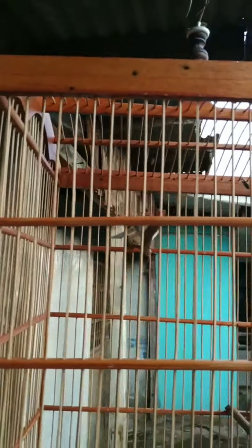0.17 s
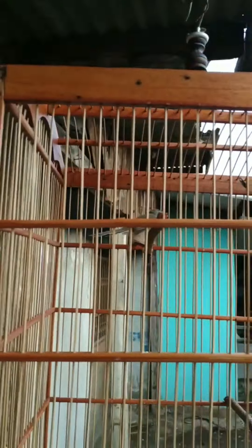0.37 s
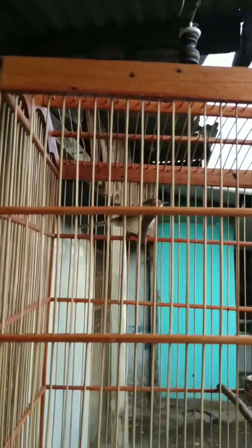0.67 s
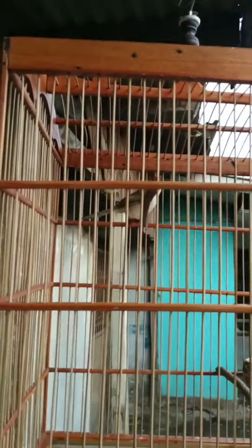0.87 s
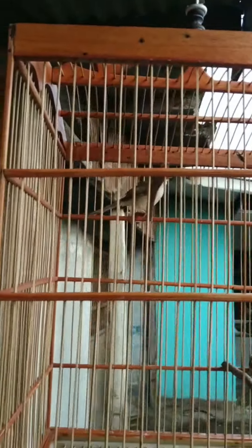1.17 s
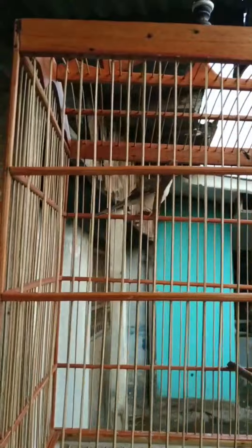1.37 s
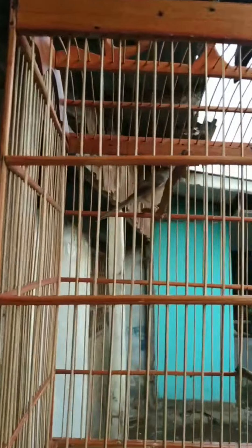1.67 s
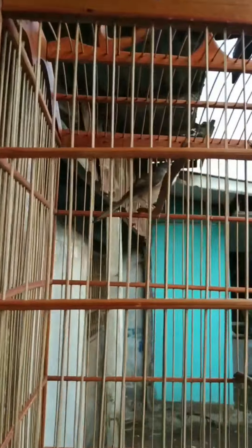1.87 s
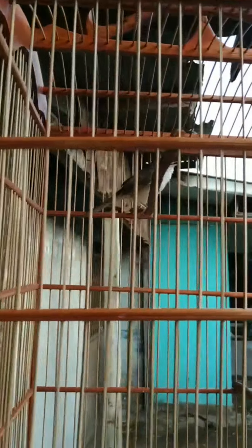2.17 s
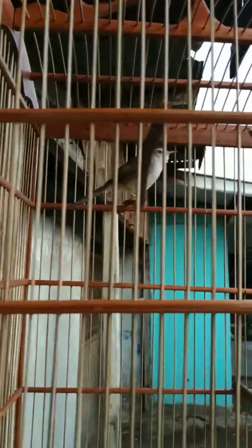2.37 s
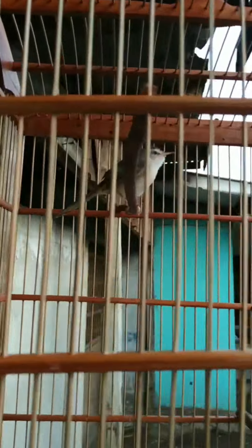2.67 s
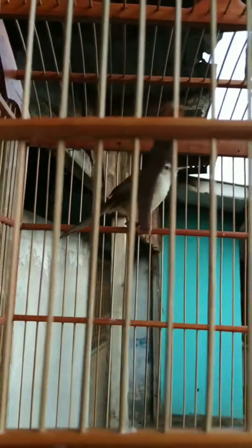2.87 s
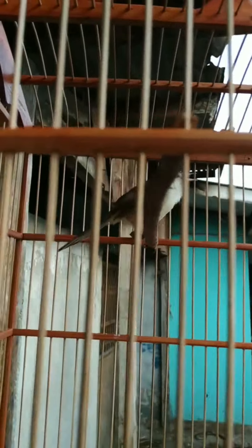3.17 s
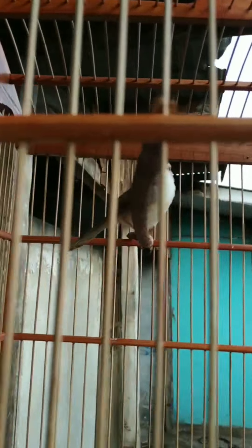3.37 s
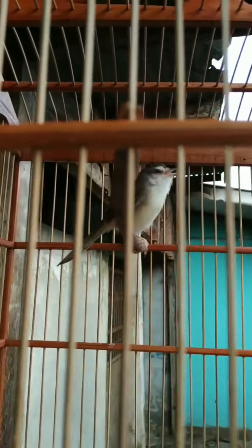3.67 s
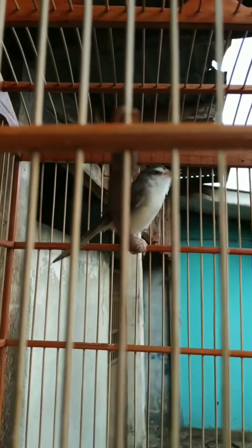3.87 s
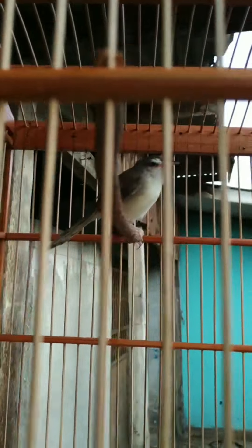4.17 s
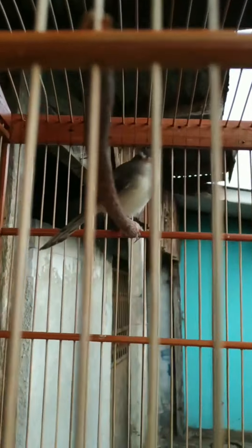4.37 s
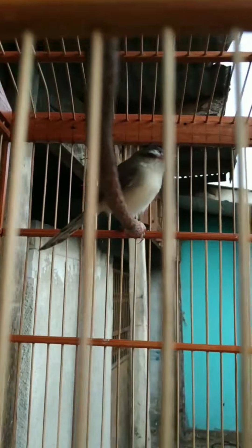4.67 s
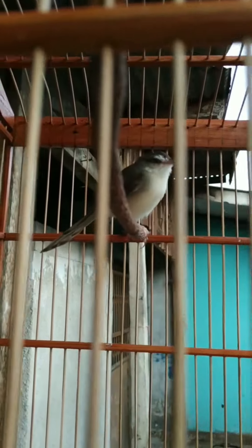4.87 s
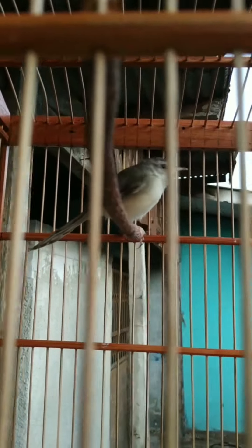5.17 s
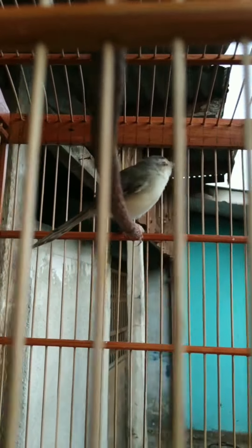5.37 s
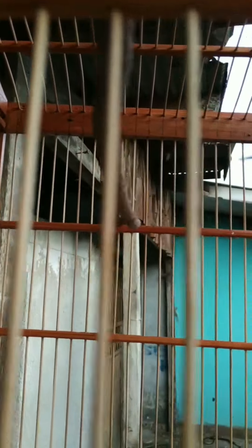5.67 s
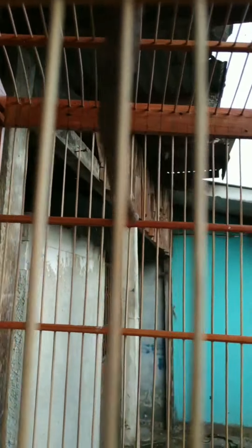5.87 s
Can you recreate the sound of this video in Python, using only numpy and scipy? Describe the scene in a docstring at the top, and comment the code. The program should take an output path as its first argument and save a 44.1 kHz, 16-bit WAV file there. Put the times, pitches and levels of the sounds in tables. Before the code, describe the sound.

Close, harsh bird buzzes come in three clusters among hard clicks and rustles, with a machine humming low and faint birds whistling late.

```python
"""Caged bird rasping in a yard

Close to a two-port microphone a small caged bird rasps in short buzzes: pulsed noise rings its throat modes.
Something nearby swishes and snaps about twice a second: shaped noise, clicks, a hollow knock and a ping.
Behind, far birds whistle as narrow gliding noise, and a machine hums in wavering lines over a wide wash.
A peak limiter catches the loud snaps and lets the yard swell back afterwards."""
import sys
import numpy as np
from scipy import signal
from scipy.fft import rfft, irfft, next_fast_len
from scipy.io import wavfile
from scipy.ndimage import uniform_filter1d, minimum_filter1d

SR = 44100
rng = np.random.default_rng(int(sys.argv[2]) if len(sys.argv) > 2 else 0)


def master_out(mix):
    """Clip the mix to full scale and print it as 16-bit PCM to the path in sys.argv[1]."""
    frames = np.transpose(np.atleast_2d(mix))
    ceiling = np.clip(frames, -1, 1)
    pcm = np.round(ceiling * 32767).astype(np.int16)
    wavfile.write(sys.argv[1], SR, pcm)


N = 264996  # length in samples

# Levels are those of each layer before the sums and trims in its function.
# Spectrum of the wide yard wash: pitch_hz, level_db
YARD_TONE = [(15, -97), (25, -78), (64, -109), (108, -72), (137, -22), (170, -2.5), (335, 1.5), (416, -5),
             (796, -18), (1480, -20.5), (2840, -20), (4610, -28.5), (10100, -26.5), (14800, -29),
             (16000, -48)]
# Slow level of the wash: time_s, level_db
YARD_LEVEL = [(0, -38.5), (1.5, -39), (2.44, -39.5), (2.7, -40), (4.02, -42.5), (5.51, -41), (6.01, -40)]
# Likeness of the wash at the two ports: pitch_hz, likeness (0 to 1)
YARD_LIKENESS = [(25, .6), (130, 0.64), (300, 0.93), (640, 0.67), (1400, 0.2), (3100, 0.017), (6800, 0.53),
                 (15000, 0.66)]
# Blurred lines of the machine hum: pitch_hz, width_hz, level_db
HUM_LINES = [(167.8, 4.8, -51.5), (230.25, 3.5, -47.5), (271.8, 7.3, -54.5), (312.7, 4, -50.5),
             (346.6, 8.5, -45.5), (352, 12, -66)]
# Common swell of those lines: time_s, gain_db
HUM_SWELL = [(0, 3.5), (.6, 2), (1.0, 5), (1.4, 1), (2.2, 1), (2.7, 4.5), (3.3, 3.5), (3.8, -0.5),
             (5, -1.5), (6.01, 2)]
# Level of the strongest line, near 200 Hz: time_s, level_db
DRONE_LEVEL = [(0, -38), (.58, -52), (.8, -37), (1.24, -60), (1.45, -35), (2.19, -40), (2.84, -54),
               (3.5, -44), (3.8, -46), (5.19, -42.5), (6.01, -46.5)]

# Far calls: start_s, length_s, first_hz, turn_hz, last_hz, turn_share (of the length), level_db, blur_hz
WHISTLES = [(4.609, 0.076, 6760, 7000, 5040, 0.4, -50.5, 200),
            (5.07, 0.13, 5370, 7120, 6650, 0.42, -47, 130),
            (5.337, 0.21, 2780, 2910, 3100, 0.44, -57.5, 100),
            (5.492, 0.11, 4930, 4870, 4800, 0.5, -51, 70), (4.532, 0.2, 3070, 3380, 3400, 0.47, -49, 230),
            (4.617, 0.12, 3700, 3850, 4000, .5, -53, 300), (4.783, 0.24, 3150, 3170, 3000, 0.36, -48, 240),
            (4.986, 0.32, 3040, 2970, 2700, 0.44, -51.5, 300),
            (5.885, 0.044, 5270, 6800, 6800, 0.68, -44.5, 159)]

# Airy strokes: middle_s, level_db, half_length_s
SWISHES = [(.01, -36.5, 0.021), (0.35, -35, 0.032), (0.7, -31.5, 0.033), (0.913, -31, 0.017),
           (1.142, -41, 0.061), (1.475, -28.5, 0.032), (1.69, -29.5, 0.017), (2.467, -31, 0.038),
           (2.73, -33.5, 0.02), (3.07, -32.5, 0.041), (3.29, -18.5, 0.011), (3.523, -43, 0.038),
           (3.69, -41, 0.037), (3.86, -42.5, 0.093), (3.986, -33.5, 0.04), (4.174, -37, 0.032),
           (4.442, -36.5, 0.026), (4.616, -41.5, 0.096), (4.917, -30, 0.03), (5.11, -40, 0.039),
           (5.457, -38, 0.047), (5.695, -31, 0.0064), (5.807, -17.5, 0.023)]
# Spectrum of swishes and snap rustles: pitch_hz, level_db
SWISH_TONE = [(1500, -11.5), (3000, -14.5), (5300, -15), (7500, -6.5), (10000, -3), (12500, 1.5),
              (14800, -7.5), (16000, 10.5)]
# Broad shuffles, the last as the bird flies off: start_s, rise_s, hold_s, fall_s, level_db, treble_db
SHUFFLES = [(0, 0.00041, 0.0069, 0.13, -37, -14), (0.233, 0.091, 0.017, 0.11, -37.5, 2),
            (.92, 0.019, .002, 0.092, -41.5, -4), (2.692, 0.042, .002, .04, -48, -8),
            (5.469, 0.0069, 0.043, .012, -46, -18), (5.653, 0.0049, 0.0016, 0.073, -39.5, 7.5),
            (5.723, 0.068, 0.031, 0.031, -30, 7)]
# Spectrum of the shuffles: pitch_hz, level_db
SHUFFLE_TONE = [(500, 6), (1200, 2), (2400, 8), (5000, 3), (9000, 0.5), (15000, -35)]
SHUFFLE_TREBLE_HZ = 6440  # treble_db acts above this
QUIET_DB = -22.5  # where a shuffle starts and ends, under its level

# Snaps: time_s, blow_db, crack_s, knock_hz, knock_db, ping_hz, ping_db, rustle_db, rustle_lead_s, rustle_rise_s
# (knock, ping and rustle levels are relative to the blow)
SNAPS = [(.161, 15, 0.00042, 1660, -19, 5500, -25, -26.5, 0.0046, 0.0099),
         (0.703, -26, 0.0014, 3970, -29, 5500, -30, 14.5, 0.0015, 0.0069),
         (1.273, 9, 0.0004, 1970, -14, 5540, -3, -18, 0.0078, 0.0051),
         (1.7055, -11, 0.00072, 2220, -30, 12500, 8, -1.5, .001, .001),
         (1.7145, -8.5, 0.00088, 2230, -2, 5500, -30, -10, 0.014, 0.0065),
         (2.2737, 16.5, 0.00076, 2160, -37, 5960, -5.5, -27.5, 0.0033, 0.0091),
         (2.8589, 4, 0.001, 1890, -14.5, 6170, -3.5, -16.5, 0.0015, 0.009),
         (3.776, 15.5, 0.0001, 1340, -24.5, 5500, -30, -34, 0.0037, 0.0087),
         (3.896, -26, 0.001, 3870, 13.5, 5500, -30, -29, .001, .004),
         (4.232, -20, 0.00085, 5000, -30, 14500, 15, -6, 0.0011, 0.0018),
         (4.2434, 10.5, 0.00018, 1904, -4.5, 5370, 2, -25, 0.0087, .002),
         (4.716, -20, 0.00058, 5000, -30, 14000, 9, -6, .001, .0015),
         (4.7208, 14, 0.00045, 1720, -13.5, 6440, -3, -16.5, 0.0042, 0.0012),
         (5.2206, 8, 0.00063, 1790, -15.5, 4930, -7, -13, 0.0025, 0.0066),
         (5.658, -27.5, 0.0017, 5000, 1, 5500, -30, 9, 0.0013, 0.00088),
         (5.7524, -5, 0.00055, 4000, -20, 5500, -30, -18, .002, .003),
         (5.775, -12, 0.0018, 4000, -8, 5500, -30, -3.5, .009, .0056),
         (5.817, -12, 0.0018, 2050, -28, 5500, -30, -7, 0.0016, .0046)]
# Spectrum of the crack: pitch_hz, level_db
CRACK_TONE = [(150, -50), (500, 6.5), (1100, -12), (1500, 9), (2500, 8.5), (5500, 1.5), (8000, 4),
              (12500, 12), (16000, -6)]
KNOCK_LAG_S = 0.00031  # the knock follows the crack
KNOCK_S, PING_S = 0.00042, 0.00019  # ring times
KNOCK_TAIL_S, KNOCK_TAIL_DB = 0.033, -39  # the hollow knock rings on faintly
KNOCK_SAG = 1.2  # and sinks in pitch, by twice this share a second
RUSTLE_STOP_S = 0.0055  # decay time of the rustle after the crack

# Buzzes: start_s, swell_s, hold_s, peak_effort_db, onset_db (against the peak), then the band levels
# low_db, upper_db, top_db, air_db; the core band, second from below, sits at CORE_DB
BUZZES = [(0.076, 0.084, 0.0018, -16.5, -8, -12.5, -3, -28, -9.5),
          (1.666, 0.026, 0.026, -21, -7, -10, 1.5, -12.5, -7),
          (1.808, 0.047, 0.016, -20, -5.5, -9, -2.5, -17, -1.5),
          (1.924, 0.084, 0.0057, -16.5, -8.5, -12.5, -1.5, -19, -5.5),
          (2.093, 0.046, 0.0019, -17, -14, -7.5, -1, -21, -4.5),
          (3.011, 0.027, 0.018, -18, -8, -12, -1.5, -15, -3),
          (3.133, 0.019, 0.074, -14, -8.5, -13, -5, -19.5, -7),
          (3.281, 0.051, 0.0054, -13.5, -8.5, -12.5, -8, -19, -5.5),
          (3.418, 0.056, 0.011, -15.5, -2, -12.5, -7.5, -21, -4.5),
          (3.594, 0.031, 0.028, -16, -7.5, -12, -5, -20.5, -6.5),
          (3.732, 0.0035, 0.068, -15.5, -6.5, -13.5, -7, -21.5, -7),
          (3.88, .002, .003, -25, -2.5, -11, -9, -26, -16),
          (3.916, 0.025, 0.0054, -12, -3.5, -15.5, -9.5, -26.5, -9),
          (5.712, 0.03, 0.013, -18, -10, -9, -5, -21, -2),
          (5.909, 0.033, 0.018, -22.5, -4, -10.5, -8, -22, -6)]
BAND_EDGES_HZ, CORE_DB = [0, 3000, 4900, 6300, 8200, SR], -5
ATTACK_S, ATTACK_DB, DROOP_DB_PER_S, RELEASE_S, RELEASE_DB = 0.013, -8.5, -34, 0.024, -25
OPEN_S, SHUT_DB = 0.22, [1.5, 3, -2, 10, 5]  # beak opening time; added to each band while it is shut
# Overall spectrum of the rasp: pitch_hz, level_db
THROAT_TONE = [(530, -61), (900, -31), (1750, -9.5), (2270, -11.5), (2750, -3.5), (3050, 2), (3350, -8),
               (3650, -2.5), (3910, -8), (4100, -10.5), (4750, -10), (5410, -8), (6560, -2), (7490, -13),
               (8050, -14), (12700, -10), (14900, -4), (16000, 5.5)]
# Throat modes: pitch_hz, width_hz (120 at least is used), level_db
RINGS = [(2020, 320, -17.5), (2273, 250, -7), (3800, 70, -10.5), (4184, 260, -4.5), (4610, 230, 0),
         (5180, 140, -7.5), (5790, 180, -13), (6480, 190, -6.5), (7170, 290, 3)]
# Phase lead of the left port: pitch_hz, lead_rad
BIRD_LEAD = [(0, -1.5), (2240, -1.5), (2600, -2.5), (3450, -1.5), (4200, -7.5), (4650, -9.5), (5430, -3.5),
             (6400, -11.5), (7100, -13.5), (8100, -11), (16000, -11.5)]
# Left level against right: pitch_hz, difference_db
BIRD_PAN = [(1200, 2), (2500, 4.5), (4200, -8), (6400, 3.5), (9800, -0.5), (15000, 5.5)]
# Single pitched throbs, strong and weak: time_s, level_db, pitch_hz
SINGLE_THROBS = [(0.092, -13, 4770), (0.1073, -8, 4520), (0.124, -9, 5240), (0.144, -9, 5200),
                 (0.154, -7, 5300), (1.685, -8, 4500), (1.712, -4, 4700), (1.7252, -11, 4940),
                 (1.8329, -8, 4440), (1.847, -8.5, 4420), (1.867, -4.5, 4760), (1.8763, -9, 5210),
                 (1.94, -14, 4550), (1.9453, -13, 4230), (1.954, -12, 4550), (1.9622, -7, 4393),
                 (1.9886, -14, 4000), (2.0047, -5.5, 4390), (2.0224, -11, 4900), (2.0275, -10.5, 4030),
                 (2.11, -18.5, 4140), (2.1163, -16.5, 4130), (2.126, -10.5, 4116), (2.1348, -15, 4850),
                 (2.1513, -14, 3980), (2.161, -8, 4450), (3.018, -21, 4160), (3.032, -7.5, 4460),
                 (3.041, -11, 4170), (3.047, -7, 4800), (3.0576, -16, 4240), (3.145, -13, 4200),
                 (3.154, -12, 4690), (3.161, -2.5, 4500), (3.179, -15, 5640), (3.1975, -6, 4390),
                 (3.2092, -8.5, 4300), (3.2325, -10, 3920), (3.303, -12, 5990), (3.3111, -13, 3940),
                 (3.321, -12, 4200), (3.3297, -16, 4160), (3.3366, -8, 4050), (3.344, -4.5, 4460),
                 (3.353, -5.5, 4450), (3.424, -10, 4200), (3.4311, -8, 4220), (3.4406, -26.5, 5740),
                 (3.4526, -20, 5730), (3.456, -10, 3970), (3.4644, -15, 5450), (3.4813, -6, 4110),
                 (3.4934, -22, 4320), (3.607, -11, 3970), (3.6138, -13, 4040), (3.6208, -7, 4500),
                 (3.632, -4, 4380), (3.6378, -9, 4180), (3.647, -10, 4410), (3.6567, -10, 4280),
                 (3.6679, -10, 4100), (3.7467, -9.5, 4360), (3.754, -19, 5440), (3.7645, -18, 4180),
                 (3.772, -18, 5190), (3.7998, -15, 4100), (3.8107, -11.5, 3930), (3.929, -9, 4240),
                 (3.9405, -6.5, 4090), (3.9486, -5, 3820), (3.9647, -18, 4400), (5.7288, -17, 3800),
                 (5.738, -16, 3860), (5.7453, -11, 4780), (5.7539, -12.5, 4460), (5.7649, -17, 3950),
                 (5.806, -13, 5960), (5.8172, -11, 6260), (5.9196, -19.5, 3960), (5.9356, -15, 4240),
                 (5.945, -17, 4160), (5.9523, -15, 4070), (5.9618, -14, 4130), (5.971, -17, 4100)]
THROBS_PER_S, THROB_DB, THROB_RING_S = 115, 0.5, 0.001106  # mean pulse, swing each way, single throb's ring
# Clear spots where one throat mode sings through the rasp: middle_s, level_db, pitch_hz
TONES = [(0.155, -12.5, 5490), (0.133, -33, 2210), (1.695, -30, 6530), (1.857, -40, 1980),
         (1.875, -23, 6650), (1.954, -31, 5800), (1.965, -33, 6600), (1.98, -32, 2070), (2.018, -23, 2580),
         (2.0204, -23, 6480), (2.165, -29.5, 6640), (2.198, -39.5, 2020), (3.0571, -29.5, 2300),
         (3.062, -23, 6280), (3.1693, -21, 6280), (3.1706, -25, 2670), (3.1713, -21, 5400),
         (3.188, -29, 2230), (3.214, -21, 5800), (3.2231, -20.5, 2366), (3.321, -26, 4150),
         (3.3372, -16, 5980), (3.3455, -28, 2316), (3.4522, -28, 5900), (3.4671, -32, 5750),
         (3.4743, -26, 2300), (3.4921, -29, 2290), (3.6302, -40, 5620), (3.6472, -25.5, 2220),
         (3.7699, -27, 5430), (3.9244, -28, 5100), (3.9545, -30, 2244), (5.95, -33.5, 1990)]
TONE_S = 0.0081  # their half length
# Two weak regions in the rasp's spectrum: time_s, lower_hz, upper_hz
WEAK_REGIONS = [(.1, 3000, 6050), (1.7, 3080, 5860), (1.95, 3000, 6000), (2.14, 2930, 5700),
                (3.05, 3330, 5600), (3.16, 3280, 6740), (3.22, 3500, 6650), (3.33, 3110, 5270),
                (3.46, 3080, 6470), (3.64, 3200, 6540), (3.95, 3140, 5770), (5.75, 3000, 6460),
                (5.95, 2790, 5530)]
WEAK_WIDTHS_HZ, WEAK_DEPTH = [650, 400], .9  # depth is the share taken out

EDGE_HZ = 15650  # upper limit of the microphone chain


def gain_of(db):
    """Decibels to a factor."""
    return 10 ** (np.asarray(db) / 20)


def evened(x):
    """Scales to rms 1."""
    return x / np.sqrt(np.mean(x ** 2) + 1e-20)


def read(points, hz):
    """Reads a table on a log-frequency axis."""
    f, value = np.transpose(points)
    return np.interp(np.log(hz + 1), np.log(f + 1), value)


def level_over_time(rows):
    """Gain along straight dB lines through a table of times and levels."""
    return gain_of(np.interp(np.arange(N) / SR, *np.transpose(rows)))


def colour(x, factor):
    """Filters by a function of frequency."""
    size = next_fast_len(x.shape[-1])
    spectrum = rfft(x, size) * factor(np.fft.rfftfreq(size, 1 / SR))
    return irfft(spectrum, size)[..., :x.shape[-1]]


def tinted(x, tone):
    """Gives x a spectrum, rms 1."""
    return evened(colour(x, lambda hz: gain_of(read(tone, hz))))


def band(x, lo, hi):
    """Keeps one band of x."""
    return colour(x, lambda hz: (hz > lo) & (hz <= hi))


def resonate(x, hz, width):
    """Rings at a moving pitch: shifts the curve hz down to zero, smooths, and shifts back."""
    turn = np.exp(2j * np.pi * np.cumsum(hz * np.ones(len(x))) / SR)
    r = np.exp(-np.pi * width / SR)
    return 2 * (turn * signal.lfilter([1 - r], [1, -r], x / turn)).real


def pair(same):
    """Two channels of white noise that are partly alike."""
    a, b = rng.standard_normal((2, N))
    same = np.clip(same, -1, 1)
    return np.array([a, same * a + np.sqrt(1 - same ** 2) * b])


def lumps(per_s, depth_db):
    """Random swelling at about per_s a second, with bounded peaks, rms 1."""
    smooth = colour(rng.standard_normal(N), lambda hz: np.exp(-(hz / per_s) ** 2) * (hz > per_s / 8))
    return evened(gain_of(depth_db * 2 * np.tanh(evened(smooth) / 2)))


def patchy(x, depth_db):
    """Random patches a few hundred Hz wide and some 50 ms long rise and sink."""
    z = signal.stft(x, nperseg=512)[2]
    patches = uniform_filter1d(rng.standard_normal(z.shape[1:]), size=6, axis=0)
    patches = evened(uniform_filter1d(patches, size=8, axis=1))
    return evened(signal.istft(z * gain_of(depth_db * patches), nperseg=512)[1][:, :N])


def stroke(corners_s, corners_db):
    """Gain along straight dB lines between corners in time, silent outside."""
    return gain_of(np.interp(np.arange(N) / SR, corners_s, corners_db, left=-200, right=-200))


def walls(x, t60, db):
    """Adds the short diffuse tail of nearby walls, duller than the direct sound."""
    t = np.arange(9000) / SR
    tail = colour(rng.standard_normal((2, len(t))), lambda hz: 1 / (1 + (hz / 7000) ** 2))
    tail = tail * gain_of(-60 * t / t60) * (t > .003)
    return x + gain_of(db) * signal.oaconvolve(x, tail / np.linalg.norm(tail[0]), axes=1)[:, :N]


def yard():
    """Low machine drone with wavering lines over a faint wide wash."""
    a, b = rng.standard_normal((2, N))
    same = lambda hz: np.clip(read(YARD_LIKENESS, hz), 0, 1)
    right = colour(a, same) + colour(b, lambda hz: np.sqrt(1 - same(hz) ** 2))
    wash = tinted(np.array([a, right]), YARD_TONE)
    lines = sum(gain_of(db) * evened(resonate(rng.standard_normal(N), hz, width))
                for hz, width, db in HUM_LINES)
    drone_hz = 200.5 * lumps(3.9, 0.06)
    drone = evened(np.sin(2 * np.pi * np.cumsum(drone_hz) / SR)) * lumps(10.7, 4.2)
    return (level_over_time(YARD_LEVEL) * patchy(wash, 2.64) + lines * level_over_time(HUM_SWELL)
            + drone * level_over_time(DRONE_LEVEL))


def far_birds():
    """Thin whistles and wheezy notes glide to a turning pitch and on, blurred by distance, unlike at each port."""
    out = np.zeros((2, N))
    for s, length_s, first_hz, turn_hz, last_hz, turn, db, blur_hz in WHISTLES:
        # u runs from -1 at the start through 0 at the turn to 1 at the end
        u = np.interp(np.linspace(0, 1, round(length_s * SR)), [0, np.clip(turn, .05, .95), 1], [-1, 0, 1])
        pitch = turn_hz + (np.where(u < 0, first_hz, last_hz) - turn_hz) * abs(u) ** 1.63
        at = round(s * SR)
        fade = signal.windows.tukey(len(u), .4) * gain_of(db)
        for side, noise in zip(out, rng.standard_normal((2, SR))):
            tone = resonate(resonate(noise[:len(u)], pitch, blur_hz), pitch, blur_hz)
            side[at:at + len(u)] += evened(tone) * fade
    return out


def rustling():
    """Airy treble swishes and broader shuffles, both grainy noise under smooth strokes."""
    t = np.arange(N) / SR
    strokes = sum(gain_of(db) * np.exp(-((t - s) / half) ** 2 / 2) for s, db, half in SWISHES)
    swish = patchy(tinted(pair(0.57) * lumps(400, 1.8), SWISH_TONE), 3) * strokes
    shuffle = tinted(pair(0.14) * lumps(200, 1.9) * lumps(1600, 2.0), SHUFFLE_TONE)
    treble = band(shuffle, SHUFFLE_TREBLE_HZ, SR)
    out = swish * gain_of([[2.3], [-2.3]])  # stronger at the left port
    for s, rise_s, hold_s, fall_s, db, treble_db in SHUFFLES:
        corners = s + np.cumsum(np.abs([0, rise_s, hold_s, fall_s]))
        shape = stroke(corners, db + np.array([QUIET_DB, 0, 0, QUIET_DB]))
        out = out + (shuffle + (gain_of(treble_db) - 1) * treble) * shape
    return out


def clicky(size):
    """Sizes of single clicks: a few stand far out."""
    return gain_of(4.5 * rng.exponential(1, size))


def ring(t, decay_s):
    """Envelope that rises to 1 after decay_s and dies away."""
    return np.e * np.maximum(t, 0) / decay_s * np.exp(-abs(t) / decay_s)


def snaps():
    """A treble rustle runs into a crack of clicks, with a hollow knock and a ping strongest at the right port."""
    out, t = np.zeros((2, N)), np.arange(-2000, 2000) / SR
    left = gain_of([[2.2], [-2.2]])  # crack and rustle favour the left port
    for s, db, crack_s, hz, knock_db, ping_hz, ping_db, rustle_db, lead_s, rustle_s in SNAPS:
        noise = rng.standard_normal((3, 2, len(t)))
        noise = noise + 0.049 * noise[:, ::-1]  # slight leak between the ports

        crack = tinted(noise[0] * clicky(len(t)), CRACK_TONE) * np.exp(-(t / crack_s) ** 2) * left
        knock_t = t - KNOCK_SAG * t ** 2 - np.array([[0], [.00008]])  # later at the right port
        knock_tail = gain_of(KNOCK_TAIL_DB) * (t > 0) * np.exp(-abs(t) / KNOCK_TAIL_S)
        knock = np.sin(2 * np.pi * hz * knock_t) * (ring(t - KNOCK_LAG_S, KNOCK_S) + knock_tail)
        ping = np.sin(2 * np.pi * ping_hz * t) * ring(t, PING_S) * np.array([[-.3], [1]])

        grains = gain_of(2.2 * np.repeat(rng.exponential(1, 100), 40))
        approach = np.exp(np.minimum(t + lead_s, 0) / rustle_s - np.maximum(t, 0) / RUSTLE_STOP_S)
        rustle = tinted(noise[1] * grains, SWISH_TONE) * approach * left
        tail = tinted(noise[2], CRACK_TONE) * np.exp(-abs(t) / np.where(t < 0, .0007, .005))

        hit = crack / abs(crack).max() + gain_of(knock_db) * knock + gain_of(ping_db) * ping
        at = round(s * SR) - 2000
        out[:, at:at + len(t)] += gain_of(db) * (hit + gain_of(rustle_db) * rustle + gain_of(-24.0) * tail)
    return walls(out, t60=0.16, db=-31)


def effort():
    """Each burst starts sharply, swells to its peak, droops a little and dies."""
    out = np.zeros(N)
    for s, swell_s, hold_s, db, onset_db, *_ in BUZZES:
        corners = s + np.cumsum(np.abs([0, ATTACK_S, swell_s, hold_s, RELEASE_S]))
        end_db = db + DROOP_DB_PER_S * hold_s
        out += stroke(corners, [db + onset_db + ATTACK_DB, db + onset_db, db, end_db, end_db + RELEASE_DB])
    return uniform_filter1d(out, size=180)


def shaded(x):
    """Gives each burst its own balance of bands, which shifts as the beak opens after the attack."""
    t, out = np.arange(N) / SR, 0
    starts = np.array([row[0] for row in BUZZES])
    burst = np.maximum(np.searchsorted(starts, t) - 1, 0)
    shut = np.clip(1 - (t - starts[burst] - ATTACK_S) / OPEN_S, 0, 1)
    levels = np.array([(low, CORE_DB, upper, top, air) for *_, low, upper, top, air in BUZZES])
    for k, (lo, hi) in enumerate(zip(BAND_EDGES_HZ, BAND_EDGES_HZ[1:])):
        out = out + evened(band(x, lo, hi)) * gain_of(levels[burst, k] + SHUT_DB[k] * shut)
    return out


def thinned(x):
    """Thins the voice around two pitches."""
    s, *regions = np.transpose(WEAK_REGIONS)
    for hz, width in zip(regions, WEAK_WIDTHS_HZ):
        path = np.interp(np.arange(N) / SR, s, hz)
        x = x - WEAK_DEPTH * np.array([resonate(port, path, width) for port in x])
    return x


def at_ports(x):
    """Sets the bird's level and phase difference between the two ports."""
    return colour(x, lambda hz: np.array([gain_of(read(BIRD_PAN, hz) / 2) * np.exp(1j * read(BIRD_LEAD, hz)),
                                          gain_of(-read(BIRD_PAN, hz) / 2)]))


def throbbing():
    """Pulse of the syrinx, about 115 a second, running on from each listed throb."""
    now, listed = np.arange(N) / SR, np.array([row[0] for row in SINGLE_THROBS])
    last_throb = listed[np.maximum(np.searchsorted(listed, now) - 1, 0)]
    turns = THROBS_PER_S * (now - last_throb) * lumps(33.0, 0.25)
    return evened(gain_of(THROB_DB * np.cos(2 * np.pi * turns)) * lumps(60, 0.86))


def throat():
    """Clumped noise rings each throat mode, over a patchy breath."""
    rung = 0
    for hz, width, db in RINGS:
        slaps = pair(0.65) * lumps(130, 4.8)
        drift = hz * lumps(13.2, 0.38)  # the modes wander as the beak moves
        rung += gain_of(db) * evened(np.array([resonate(x, drift, max(width, 120)) for x in slaps]))
    breath = patchy(pair(0.9) * lumps(760, 0.71), 6.0)
    return at_ports(tinted(rung + gain_of(1.5) * breath, THROAT_TONE))


def single_throbs():
    """Short rings of single throbs, and the puff each lets out through all the bands."""
    u = np.arange(400) / SR / THROB_RING_S
    rings, puffs = np.zeros((2, N))
    for s, db, hz in SINGLE_THROBS:
        at = round((s - THROB_RING_S) * SR)
        puff = gain_of(db) * u * np.exp(1 - u)
        rings[at:at + len(u)] += puff * np.sin(2 * np.pi * hz * THROB_RING_S * u)
        puffs[at:at + len(u)] += puff
    return at_ports(rings * lumps(1000, 1.1)), puffs


def clear_tones():
    """Brief sines where one throat mode sings out."""
    u, tones = np.arange(-400, 400) / SR / TONE_S, np.zeros(N)
    for s, db, hz in TONES:
        at = round(s * SR) - 400
        tones[at:at + len(u)] += gain_of(db + 1.5) * np.exp(-u ** 2) * np.sin(2 * np.pi * hz * TONE_S * u)
    return tones


def bird():
    """The throbbing syrinx drives the throat in bursts, close to the ports; walls add a short tail."""
    throb = throbbing()
    rings, puffs = single_throbs()
    push = effort() + gain_of(-9.0) * puffs
    voice = shaded(throat()) * throb * gain_of(-4.5) * push + gain_of(-5.5) * rings
    return thinned(walls(voice, t60=0.24, db=-13)) + at_ports(clear_tones() * throb * lumps(260, 5.2))


def scene():
    """All sources at the two ports, from the far yard to the close bird."""
    return yard() + far_birds() + rustling() + snaps() + bird()


def record(dry):
    """The microphone drops deep bass; a limiter falls at once on peaks and recovers slowly; then the band limit."""
    dry = signal.sosfilt(signal.butter(3, 90 / (SR / 2), "high", output="sos"), dry)
    peak_db = 20 * np.log10(-minimum_filter1d(-abs(dry).max(0), size=41) + 1e-9)
    fall = np.arange(N) * 240.0 / SR  # the held peak sinks 240 dB a second
    held_db = np.maximum.accumulate(peak_db + fall) - fall
    over_db = np.maximum(held_db + 1.5, 0)  # excess above -1.5 dB
    limited = dry / gain_of(.92 * uniform_filter1d(over_db, size=40))  # most of the excess is taken off
    low_pass = signal.firwin(301, EDGE_HZ, window=("kaiser", 9), fs=SR)
    return signal.oaconvolve(limited, low_pass[None], "same")


dry = scene()
out = record(dry)
master_out(out)
```